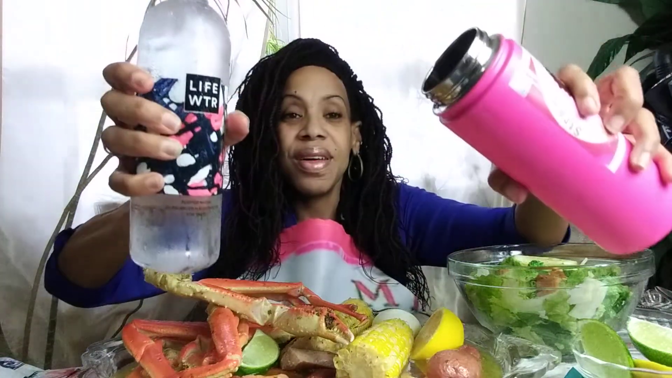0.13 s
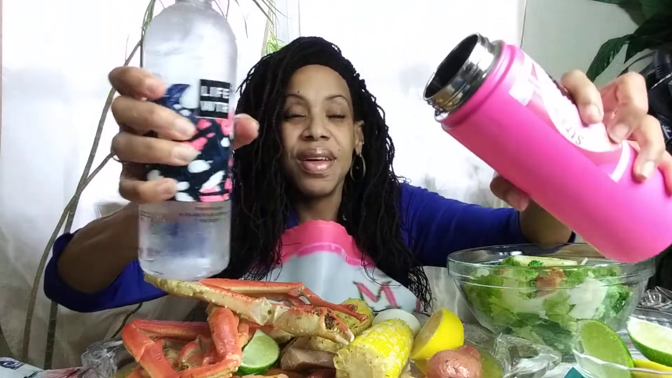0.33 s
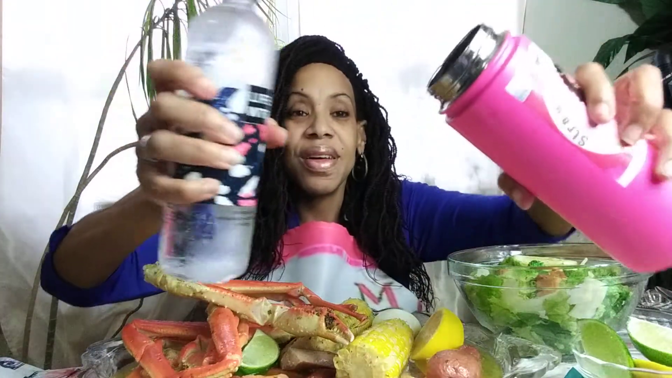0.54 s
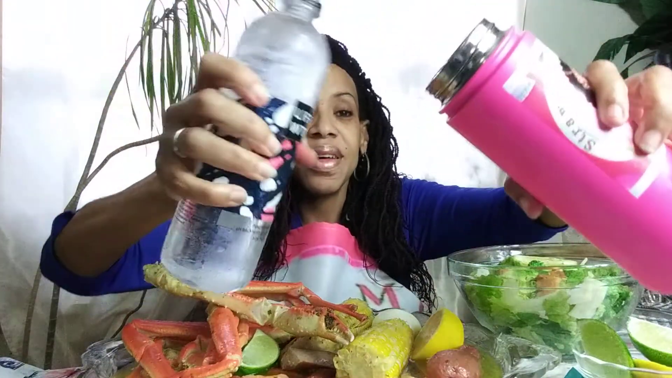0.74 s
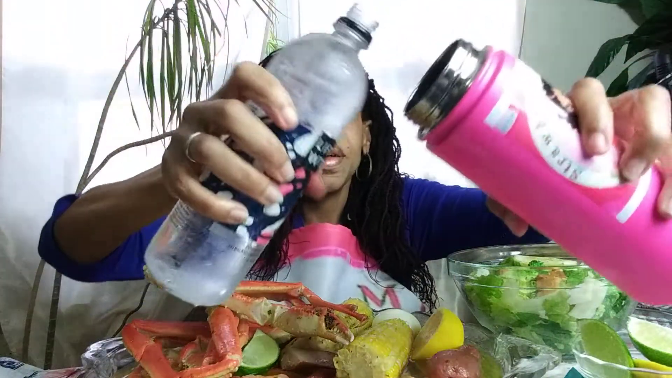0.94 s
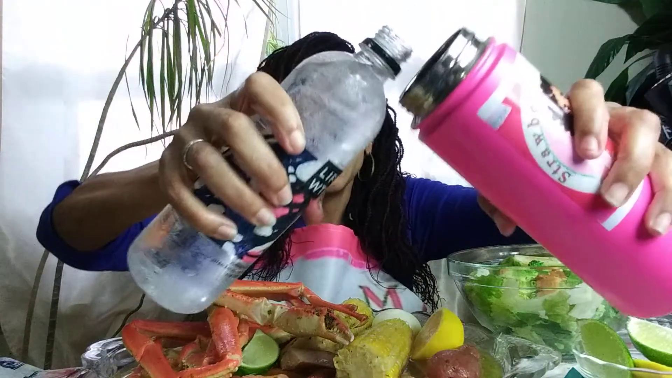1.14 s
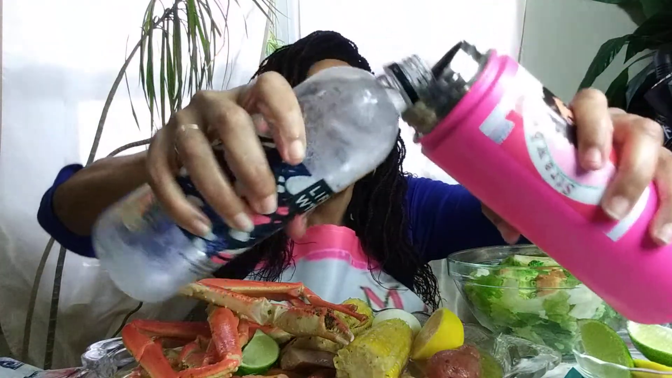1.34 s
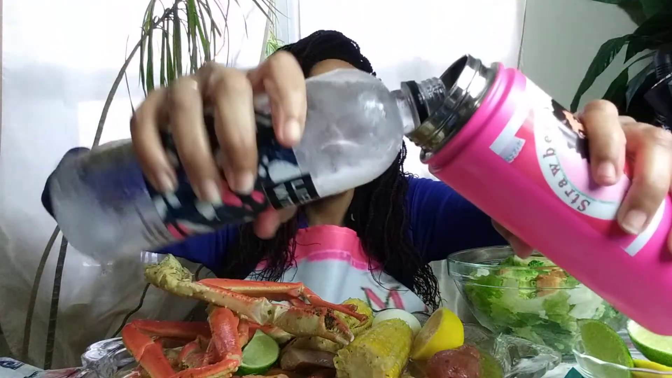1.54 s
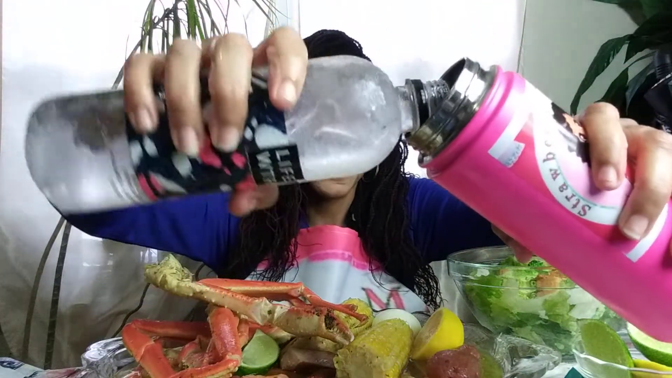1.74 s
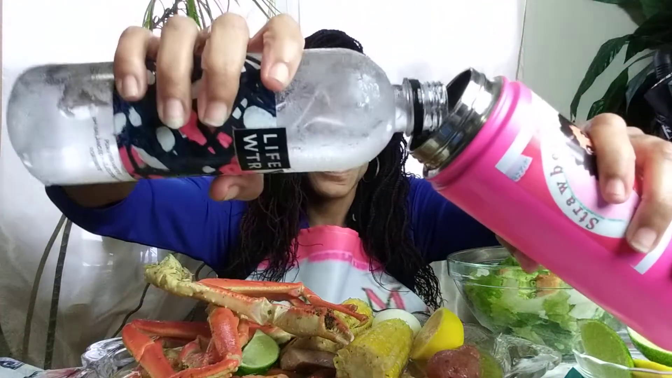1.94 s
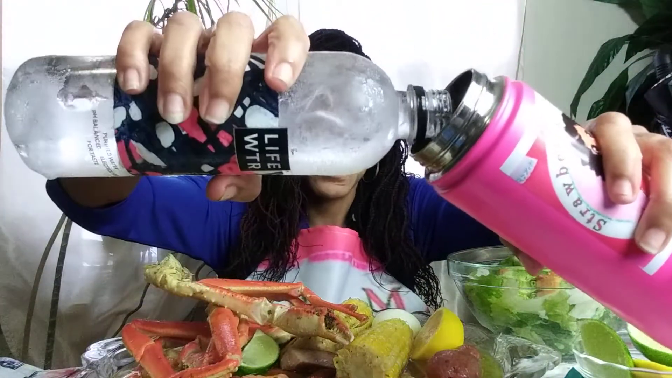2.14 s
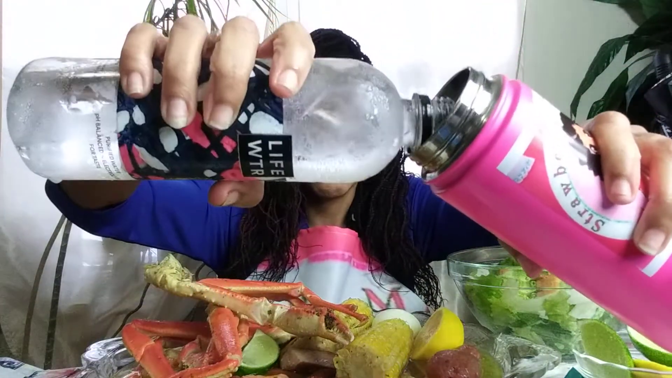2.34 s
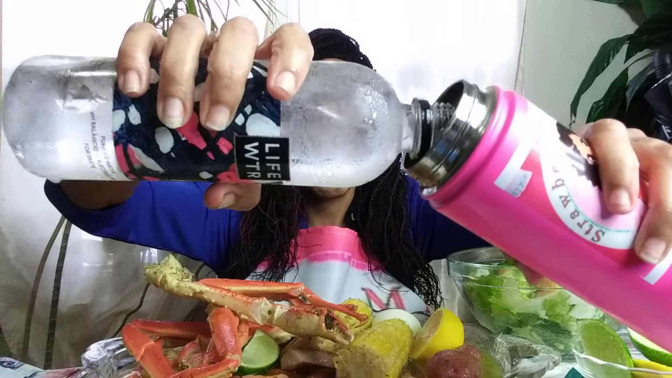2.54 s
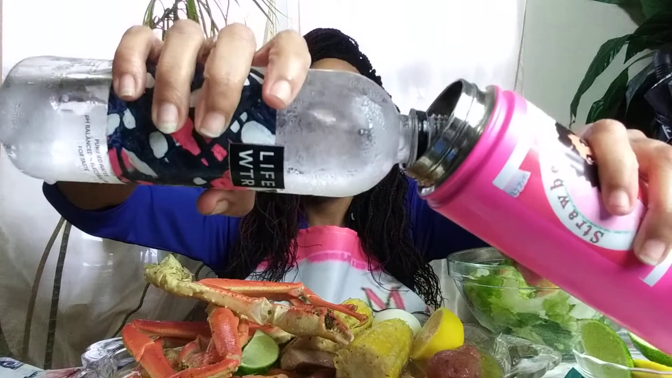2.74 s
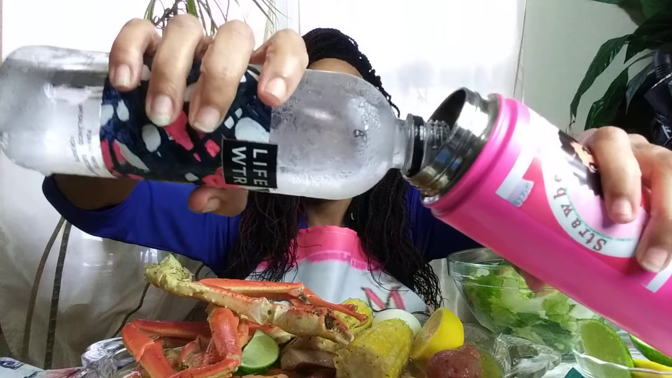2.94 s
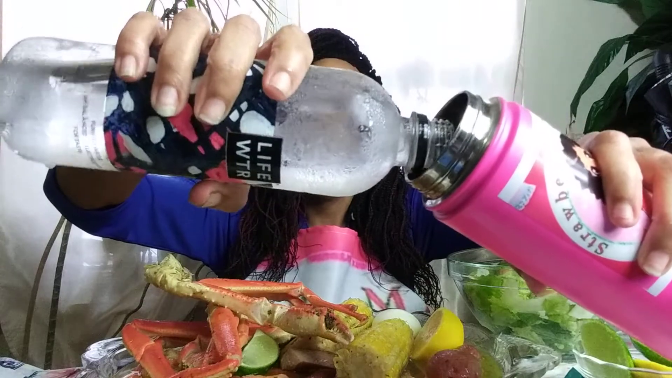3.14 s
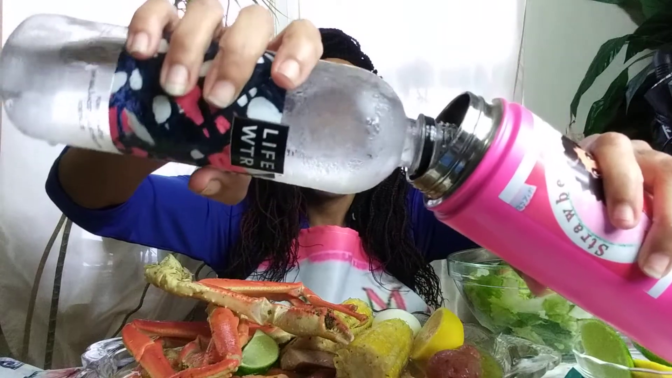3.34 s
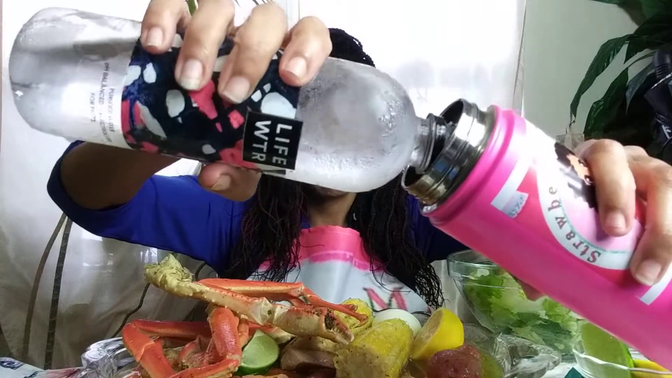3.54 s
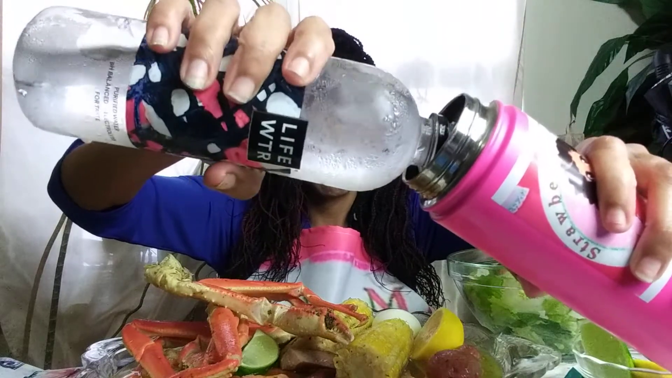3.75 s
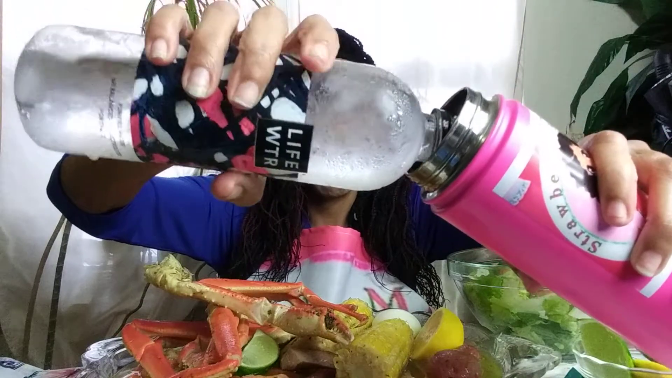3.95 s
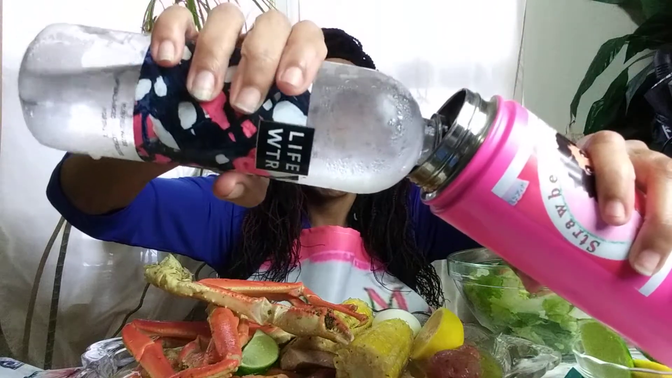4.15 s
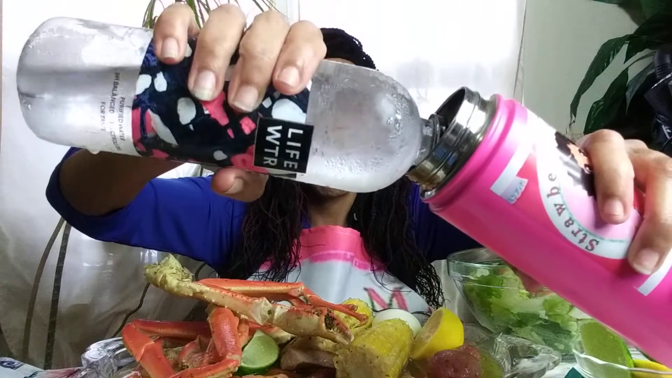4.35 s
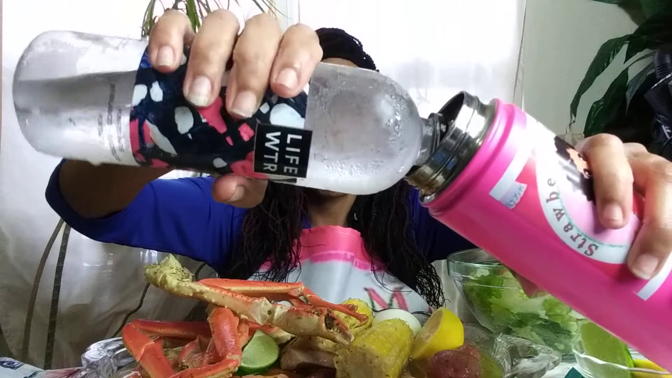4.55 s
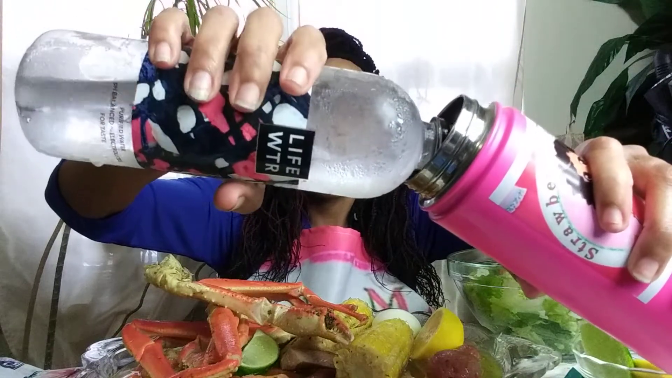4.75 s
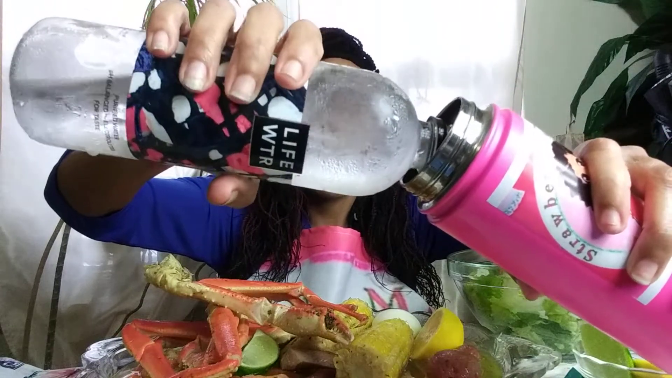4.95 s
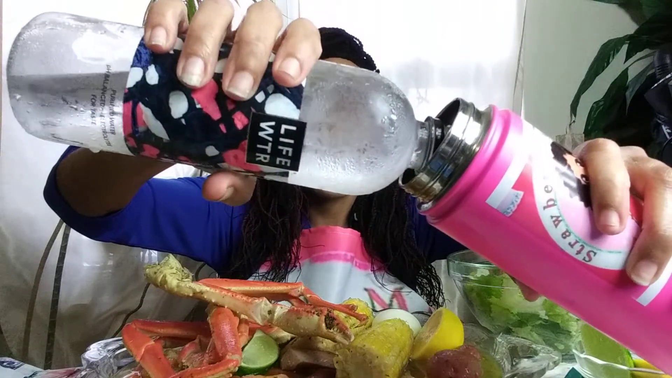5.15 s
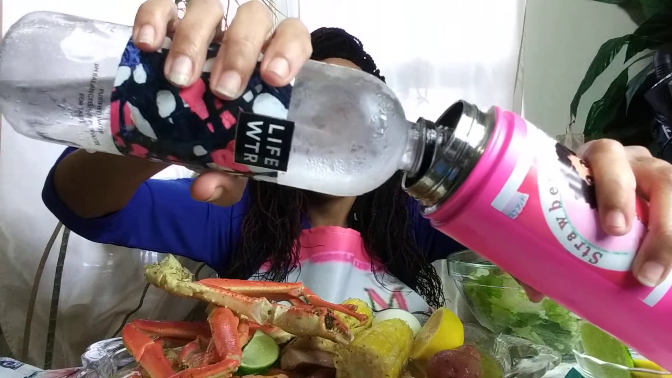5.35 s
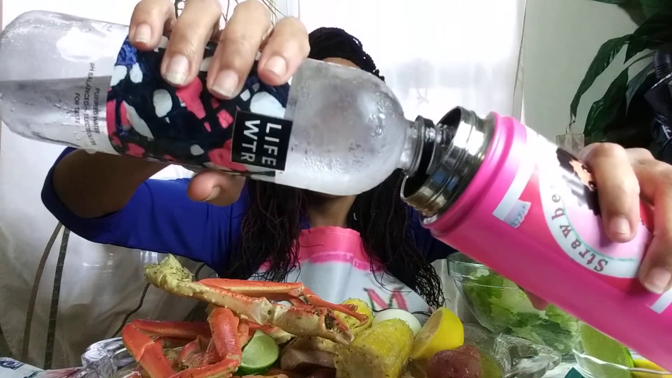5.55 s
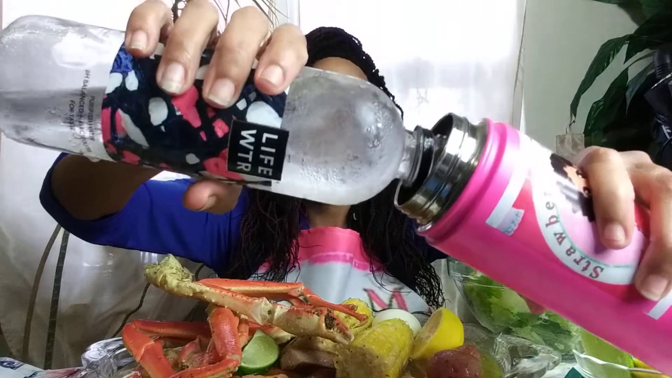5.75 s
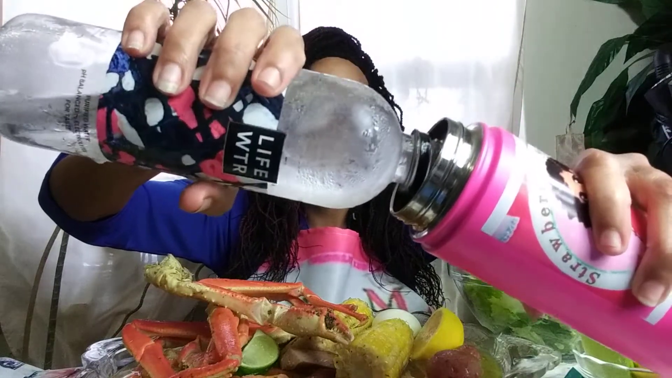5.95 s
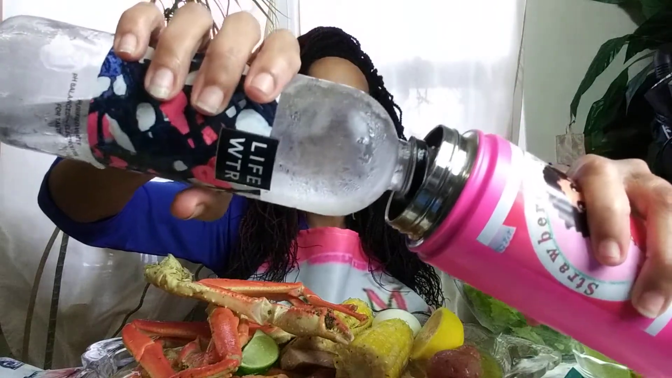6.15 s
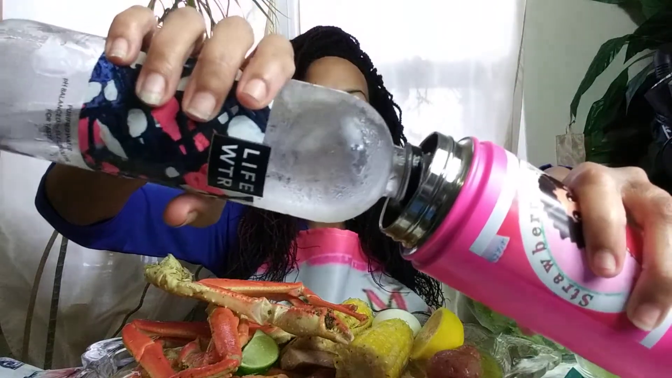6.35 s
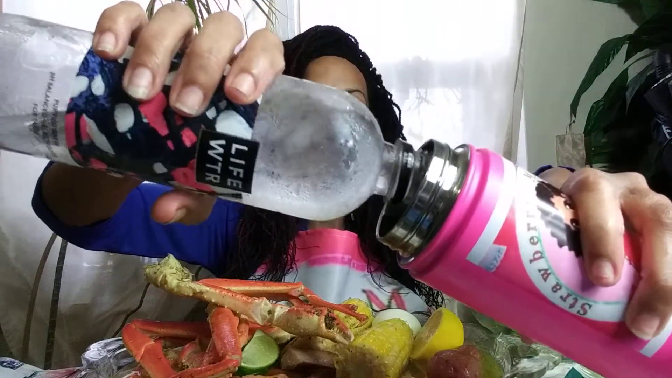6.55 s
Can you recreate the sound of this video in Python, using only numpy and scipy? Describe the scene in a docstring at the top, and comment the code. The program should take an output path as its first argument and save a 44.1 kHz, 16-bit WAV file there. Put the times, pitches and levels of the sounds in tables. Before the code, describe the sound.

Water glugs and trickles from a plastic bottle into a steel tumbler while ice cracks and clinks against the metal.

```python
"""Water glugs from a plastic bottle into a steel tumbler that holds ice, in a small live room.
Room tone is heard alone until, near 1.4 s, the first water plops, ice cracks against the steel
and rings its wall modes, and the bottle gulps air. Dry ticks follow; after 2.1 s a trickle sets in.
Each glug excites the tumbler's air column, whose resonance climbs as the water shortens it,
while the rising water damps the wall."""
import sys
import numpy as np
from scipy import signal
from scipy.fft import rfft, irfft
from scipy.io import wavfile
from scipy.ndimage import uniform_filter1d

SR = 44100
rng = np.random.default_rng(int(sys.argv[2]) if len(sys.argv) > 2 else 0)


def digitize_waveform(pressure):
    """Quantize a signal to 16-bit integers and store it at the path in sys.argv[1].

    Rows of a 2-D input are taken as channels; values are limited to [-1, 1].
    """
    field = np.atleast_2d(pressure).T
    bounded = np.clip(field, -1, 1)
    quanta = np.round(bounded * 32767).astype(np.int16)
    wavfile.write(sys.argv[1], SR, quanta)


N = 291501


def amp(db):
    return 10 ** (np.asarray(db) / 20)


def unit_rms(x):
    return x / np.sqrt(np.mean(x ** 2) + 1e-20)


def at_hz(points, hz):
    f, value = np.transpose(points)
    return np.interp(np.log(hz + 1), np.log(f + 1), value)


def at_time(points, s):
    return np.interp(s, *np.transpose(points))


def curve(points):
    return at_time(points, np.arange(N) / SR)


def add(mix, s, sound):
    part = mix[round(s * SR):][:len(sound)]
    part += sound[:len(part)]


def coloured(noise, spectrum):
    """Spectral shaping: noise of rms 1, weighted by (Hz, dB) points."""
    gain = amp(at_hz(spectrum, np.fft.rfftfreq(len(noise), 1 / SR)))
    return unit_rms(irfft(rfft(noise) * gain, len(noise)))


def resonate(x, hz, width_hz):
    """Forced resonance: x drives one mode whose natural frequency follows hz."""
    turn = np.exp(2j * np.pi * np.cumsum(hz) / SR)
    return (turn * signal.lfilter([1], [1, -np.exp(-np.pi * width_hz / SR)], x / turn)).real


def damped_tone(t, hz, t60, rise_s, glide):
    """Damped oscillation with a soft onset; pitch moves by glide times hz each second."""
    envelope = (1 - np.exp(-t / rise_s)) * amp(-60 * t / t60)
    return envelope * np.sin(2 * np.pi * hz * t * (1 + glide * t / 2))


# Background spectrum. Each row: frequency in Hz, relative density in dB.
ROOM_TONE_SPECTRUM = [(18, -92), (30, -67), (103, -16.5), (145, -13.5), (174, -5.5), (259, -3.5),
                      (415, -11.5), (499, -8), (569, -14.5), (702, -15), (1390, -19.5), (2610, -16.5),
                      (3220, -25.5), (7470, -27), (16000, -51.5)]
def room_tone(level_db=-61.5):
    """Stationary noise: a faint hush, strongest in the low hundreds of hertz."""
    return amp(level_db) * coloured(rng.standard_normal(N), ROOM_TONE_SPECTRUM)


# Underwater knocks and plops. Each row: start in seconds, note level in dB, pitch in Hz, splash in dB.
PLOPS = [(1.371, -33.5, 1157, -43.5), (1.386, -31, 1170, -43.5), (1.388, -38, 1056, -49),
         (1.517, -51, 1006, -47.5), (1.786, -52, 1460, -49), (1.786, -48, 880, -64),
         (2.065, -35, 1466, -39), (2.068, -41, 872, -43), (2.205, -19.5, 2129, -36),
         (2.207, -36, 1737, -44), (2.224, -21, 1311, -39), (2.342, -33.5, 2218, -43),
         (2.382, -43, 812, -37), (2.419, -36, 1200, -60), (2.5, -40.5, 2080, -55), (2.503, -36, 1197, -47),
         (2.532, -33, 1191, -42), (2.575, -38.5, 2067, -55), (2.61, -32.5, 1269, -40),
         (2.776, -42.5, 1295, -42), (2.802, -41, 968, -42), (3.043, -36, 1216, -38.5),
         (3.23, -45, 1880, -45), (3.454, -44, 980, -38.5), (3.474, -46, 1116, -37.5),
         (3.494, -39, 1860, -62), (3.575, -27, 1172, -31.5), (3.585, -42, 2320, -46),
         (3.7, -49, 1140, -40.5), (3.777, -44, 1350, -53), (3.818, -34, 1136, -40), (3.83, -32, 1132, -55),
         (3.856, -40, 1140, -53), (3.873, -42.5, 1893, -42.5), (4.104, -47, 2330, -36),
         (4.108, -28, 2965, -39), (4.176, -44, 1394, -40), (4.455, -47, 750, -52), (4.57, -38.5, 2970, -60),
         (4.937, -42, 2370, -41), (4.94, -44, 1150, -55), (5.346, -45.5, 1127, -60),
         (5.415, -46, 1850, -58), (5.42, -48, 1470, -59), (5.579, -39, 1437, -53),
         (5.689, -42.5, 1446, -48), (5.747, -41.5, 1433, -48), (5.778, -44, 1433, -55),
         (5.838, -40.5, 643, -51), (5.785, -39, 2404, -54), (5.906, -48, 2460, -44.5),
         (6.038, -34.5, 1760, -39.5), (6.113, -26, 3780, -53), (6.117, -45, 1410, -55),
         (6.15, -47, 1200, -62), (6.198, -37, 1560, -39), (6.203, -40, 1000, -38),
         (6.272, -35.5, 1712, -36), (6.273, -35.5, 1455, -42), (6.403, -41, 1640, -56),
         (6.457, -38.5, 1724, -41.5), (6.47, -43, 850, -55), (6.5, -43, 1640, -60),
         (6.552, -32, 910, -40.5)]
# Their decay, longest in the near-empty tumbler. Each row: time in seconds, t60 in seconds.
PLOP_DECAY = [(1.3, 0.077), (2.1, 0.16), (2.6, 0.097), (3, .05), (3.6, 0.072), (4.3, 0.12), (5.6, .08),
              (6.6, 0.068)]
def plops():
    """Beating: two close damped tones interfere, under a short splash of noise."""
    out, t = np.zeros(N), np.arange(16384) / SR
    sag = -0.172  # water climbing the wall pulls each note down
    for s, db, hz, splash_db in PLOPS:
        t60 = at_time(PLOP_DECAY, s)
        note = damped_tone(t, hz, t60, 0.0029, sag)
        note += amp(-8) * damped_tone(t, 1.028 * hz, t60, 0.003, sag)
        hump = [(300, -25), (hz * .78, -3), (hz, 0), (hz * 1.46, -6),
                (4000, -18), (6000, -28), (12000, -50)]
        splash = coloured(rng.standard_normal(len(t)), hump)
        splash *= np.exp(-t / 0.0069) * (1 - np.exp(-t / 0.00037))
        add(out, s - .002, amp(db) * note + amp(splash_db) * splash)
    return out


# Spectrum of cracking ice. Each row: frequency in Hz, relative density in dB.
CRACK_SPECTRUM = [(880, -43), (1500, 11.5), (1720, -35), (1900, -2.5), (2770, -14), (2970, -5), (6500, 2),
                  (7540, 4.5), (16000, -51.5)]
def ice_crack(t, colour, contact):
    """Brittle fracture: a burst of noise, then millisecond grains as the ice crumbles."""
    hz = np.linspace(800, 16000, 60)
    humps_db = 4 * rng.standard_normal(len(hz))  # every piece of ice has its own
    db = at_hz(CRACK_SPECTRUM, hz) + at_hz(colour, hz) + humps_db
    noise = coloured(rng.standard_normal(len(t)), list(zip(hz, db)))
    grains = amp(4 * np.minimum(np.repeat(rng.exponential(1, len(t) // 60), 60), 4) - 6)
    crumble = 0.07 * uniform_filter1d(grains ** 2, size=90) * np.exp(-t / 0.034)
    return noise * (1 - np.exp(-t / 0.0021)) * (contact + crumble)


# Clusters of wall modes. Each row: frequency in Hz, relative frequency spread, relative level in dB.
WALL_MODES = [(2447, 8.7, -20), (2960, 12, -21), (3347, 34.7, -14), (3520, 28, -15.5), (3767, 28.3, -8),
              (4470, 43, -23), (4746, 70, -9), (5080, 75.6, -5.5), (5960, 50, -5.5), (6320, 100, -9.5),
              (6950, 68, -4), (7140, 60, -3), (7550, 130, -18), (7560, 78, -7.5), (7700, 22, -7.5),
              (8060, 290, -6.5), (8140, 41, -5), (9250, 149, -8.5), (9850, 25, -19.5), (10200, 52, -32),
              (10440, 94, -24), (11300, 97, -43), (11500, 20, -22), (12600, 200, -28.5),
              (13900, 220, -25.5), (15200, 250, -33)]
# Damping by the rising water. Each row: time in seconds, typical t60 at 5 kHz in seconds.
WALL_DECAY = [(1.3, 0.24), (2.4, 0.2), (3.5, 0.088), (6.6, 0.1)]
def steel_ring(t, s, colour):
    """Modal superposition: nine partials a cluster, weighted by where the blow at time s lands."""
    hz, spread, db = np.repeat(np.transpose(WALL_MODES), 9, axis=1)
    strength, shift, life, phase = rng.standard_normal((len(hz), 4)).T
    spot_db = np.repeat(rng.standard_normal(len(WALL_MODES)), 9) * np.clip(s - 2.3, 0, 2.5)
    weights = amp(db + at_hz(colour, hz) + 3.5 * strength + spot_db)
    t60 = at_time(WALL_DECAY, s) * amp(2.14 * life) * (hz / 5000) ** -.55
    # partials scatter more as the water rises, and in the treble
    scatter = .002 + .011 * (s - 1.3) + .03 * np.minimum(hz / 12000, 1) ** 4
    partial_hz = hz + (0.601 * spread + scatter * hz) * shift
    partials = np.sin(2 * np.pi * (partial_hz[:, None] * t + phase[:, None]))
    return weights @ (amp(-60 * t / t60[:, None]) * partials) / np.linalg.norm(weights)


# Ice striking steel. Each row: start in seconds, blow level in dB, leading partial in Hz,
# its level relative to the blow in dB, boost near 4 kHz in dB, boost near 11 kHz in dB.
ICE_BLOWS = [(1.383, -27.5, 3810, -13, 17.5, 3), (1.6904, -34, 8430, -20, -14, 9),
             (1.7866, -17, 7020, -20, 1, 0), (1.8114, -21.5, 6320, -4.5, 7, 18),
             (1.917, -25, 7210, -4.5, -1.5, 13), (1.9707, -14.5, 7600, -9, -23, -1.5),
             (2.07, -6.5, 5877, -4.5, 2, -9), (2.0829, -5.5, 7100, -5, -7, 6),
             (2.206, -10.5, 5150, -3.5, -12.5, -5), (2.2246, -8.5, 6550, -25, -8, 5.5),
             (2.2572, -14, 7120, 1.5, -15, -13), (2.4375, -28.5, 4864, -9, -5, 3),
             (2.5, -26.5, 7640, -14, -6, 3), (2.5648, -29.5, 6980, -25, -2, 7),
             (2.6624, -21, 4590, -9, 8.5, 4), (2.815, -25, 7630, -16, 0, 10),
             (2.859, -27, 6750, -15, -1, -3), (3.1, -45, 4950, -20, 14, 2), (3.18, -49, 7850, -4, -5, -3),
             (3.25, -43, 2850, -6, 6, -2), (3.278, -43, 7000, -15, 7, -2),
             (3.3284, -18, 7670, -6.5, -3, 12), (3.494, -32.5, 4570, -3.5, -2, -7),
             (3.6145, -35, 6000, -9, 1, -6), (3.685, -31, 3830, -9, 21, 4), (3.765, -37, 2890, -12, 3, -2),
             (3.8116, -34, 6230, -13, 4, 9), (3.8711, -33, 7130, -8, 4, -2), (4.0033, -38, 8120, -8, 7, -2),
             (4.0623, -21, 4200, -17, 9.5, 0), (4.1076, -14.5, 7580, -11, 3.5, 3),
             (4.1562, -15, 8110, -8.5, -0.5, 1), (4.2997, -28, 6710, -11, 1.5, 10),
             (4.329, -24.5, 7540, -7, 3.5, 12), (4.4307, -27, 4064, -11, 3, -1),
             (4.571, -19, 7600, -14, 3, 5), (4.8463, -32.5, 7600, -9, 0.5, 6),
             (4.936, -20.5, 3010, -14, 9, -1), (4.9777, -21.5, 4170, -14, 6, -5),
             (5.008, -31.5, 7000, -15, 3, 0), (5.1274, -15, 7660, -10.5, 3.5, 0),
             (5.258, -38.5, 4370, -10, 16, 6), (5.4094, -19, 7600, -12.5, 1, -4),
             (5.5188, -26.5, 7460, -16, 0, -4), (5.5301, -20, 7560, -11, 0, -6),
             (5.656, -22.5, 7400, -10.5, 1.5, 1), (5.7654, -19.5, 3780, -19, 2.5, -8),
             (5.8694, -35.5, 7300, -9, 8, 3), (6.0395, -14.5, 4620, -13.5, 3, -1),
             (6.057, -20.5, 4580, -11, 4, 0), (6.1145, -13, 7540, -22, -2, 0),
             (6.32, -32.5, 3574, -7, 7.5, 0), (6.4033, -21, 7250, -15.5, 0.5, -1.5),
             (6.466, -34, 5000, -20, 6, -10), (6.4826, -27, 5140, -8, 5, -20),
             (6.551, -31.5, 6340, -18, 5, 10)]
def clinks():
    """Impact excitation: every blow cracks the ice and sets the steel in free vibration."""
    out, t = np.zeros(N), np.arange(9000) / SR
    contact = np.exp(-t / 0.0065)
    for s, blow_db, lead_hz, lead_db, low, high in ICE_BLOWS:
        colour = [(1500, low - 6), (4000, low), (7000, 0.011), (11000, high), (15000, high - 1.5)]
        crack = ice_crack(t, colour, contact)
        ring = steel_ring(t, s, colour) * (1 - 0.58 * contact ** 3)
        lead = damped_tone(t, lead_hz, t60=0.069 * (s / 2) ** -.3, rise_s=0.00072, glide=0)
        # harder blows ring more, a wetter wall less
        ring_share = np.clip(.7 + 0.09 * (blow_db + 24.5) - 0.051 * s, 0, 1)
        sound = 0.8 * (1 - ring_share) * crack + .5 * ring_share * ring + amp(lead_db) * lead
        add(out, s - .002, amp(blow_db) * sound)
    return out


# Air gulped at the bottle neck. Each row: start in seconds, relative level in dB.
GLUGS = [(1.385, -43), (2.223, -53), (2.274, -55), (2.38, -46.5), (2.455, -49.5), (2.538, -45.5),
         (2.606, -46.5), (2.68, -51), (2.72, -49.5), (2.773, -47.5), (2.8, -47.5), (2.823, -50),
         (2.926, -52), (3.041, -48.5), (3.184, -47), (3.248, -45), (3.28, -46), (3.454, -47),
         (3.573, -45.5), (3.635, -45.5), (3.692, -43), (3.815, -43), (3.855, -43), (3.97, -45),
         (4.066, -40.5), (4.152, -46.5), (4.26, -44.5), (4.332, -46.5), (4.453, -41), (4.567, -45),
         (4.674, -42.5), (4.776, -44.5), (4.881, -42.5), (4.967, -46), (5.07, -44), (5.173, -48.5),
         (5.26, -44), (5.348, -23), (5.469, -50), (5.579, -49.5), (5.676, -46.5), (5.695, -44),
         (5.72, -46.5), (5.793, -44.5), (5.838, -37.5), (5.906, -42.5), (6.02, -49), (6.034, -36),
         (6.059, -36.5), (6.085, -43.5), (6.202, -45.5), (6.277, -48), (6.386, -42.5), (6.46, -43.5),
         (6.483, -45), (6.552, -40), (6.578, -44)]
# Lowest resonance of the tumbler's air column. Each row: time in seconds, frequency in Hz.
AIR_COLUMN = [(1.3, 375), (2.4, 378.4), (3.2, 395), (4.1, 404.5), (4.7, 429), (5.3, 470), (5.9, 499),
              (6.1, 499), (6.3, 537.6), (6.6, 592)]
def glugs():
    """Air-column resonance: a bubble thumps low, sweeps upward and drives two modes that ring on."""
    gulp, thump, t = np.zeros(N), np.zeros(N), np.arange(4096) / SR
    for s, db in GLUGS:
        hz = at_time(AIR_COLUMN, s) * rng.normal(1.0045, 0.011)
        add(gulp, s - .004, amp(db) * damped_tone(t, hz, 0.057, 0.0028, glide=4.3))
        add(thump, s - .006, amp(min(db, -41) - 2) * damped_tone(t, 0.63 * hz, 0.037, 0.0012, glide=13))
    air_hz = curve(AIR_COLUMN)
    column = amp(-41.5) * resonate(gulp, air_hz, 11.6) + amp(-15.5) * resonate(gulp, 2.5 * air_hz, 32)
    return amp(4) * gulp + thump + column


# Dry clicks. Each row: start in seconds, level in dB, centre frequency in Hz.
TICKS = [(1.672, -46.5, 2300), (1.692, -39, 5200), (1.729, -49, 2500), (3.455, -40, 2800),
         (3.475, -37.5, 2750), (4.499, -46, 7200), (4.691, -47, 9500)]
def ticks():
    """Transients: bands of noise that decay in milliseconds and leave the steel silent."""
    out, t = np.zeros(N), np.arange(2048) / SR
    for s, db, hz in TICKS:
        band = [(300, -30), (.6 * hz, -12), (hz, 0), (1.3 * hz, -10), (2 * hz, -36)]
        click = coloured(rng.standard_normal(len(t)), band)
        add(out, s - .001, amp(db) * click * np.exp(-t / 0.0026))
    return out


# Strength of the trickle. Each row: time in seconds, bubble level in dB.
TRICKLE_LEVEL = [(2.1, -100), (2.4, -51), (3, -58), (3.6, -57.5), (4.2, -60), (4.8, -57.5), (5.4, -64.5),
                 (6, -62), (6.2, -49), (6.6, -77)]
# The finest bubbles bursting. Each row: frequency in Hz, relative density in dB.
FIZZ_SPECTRUM = [(2000, -30), (4000, -23), (7500, 11.5), (9500, -1), (14000, -27)]
def trickle():
    """Bubble resonance: the stream traps clumps of bubbles, each ringing at the pitch of its size."""
    bubbles, t = np.zeros(N), np.arange(1024) / SR
    clumps = np.repeat(rng.exponential(1, N // 400 + 1), 400)[:N]
    for hz in np.geomspace(600, 6000, 30):
        strength = amp(3 * np.minimum(rng.exponential(1, N), 3))
        births = rng.random(N) < 30 * clumps / SR
        bubble = damped_tone(t, hz, 50 / hz, 0.95 / hz, glide=7.8) * (hz / 1000) ** 0.56
        bubbles += signal.oaconvolve(strength * births, bubble)[:N]
    bursts = rng.standard_normal(N) * amp(4.7 * np.minimum(rng.exponential(1, N), 5))
    spurts = np.repeat(rng.exponential(1, N // 1500 + 1), 1500)[:N]
    fizz = coloured(bursts, FIZZ_SPECTRUM) * uniform_filter1d(spurts, size=600) ** .7
    water = (unit_rms(bubbles) + amp(-9) * fizz) * amp(curve(TRICKLE_LEVEL))
    return water + amp(-64) * resonate(water, curve(AIR_COLUMN), 6.7)


# Reverberation time of the room. Each row: frequency in Hz, t60 in seconds.
ROOM_DECAY = [(200, 0.29), (1000, 0.46), (4000, 0.38), (8000, 0.32), (14000, 0.2)]
def reverberation(x):
    """Reverberant decay: three tails of sparse reflections, fed in turn, each band at its own rate."""
    out, turn = np.zeros(N), 2 * np.pi * 2.3 * np.arange(N) / SR
    slots = np.arange(200, SR - 20, 20)
    for k in range(3):
        taps = np.zeros(SR)
        taps[slots + rng.integers(0, 20, len(slots))] = rng.choice([-1., 1.], len(slots))
        hz, t, bands = signal.stft(taps, SR, nperseg=256)
        decay = amp(-60 * t / at_hz(ROOM_DECAY, hz)[:, None])
        tail = signal.istft(bands * decay, SR, nperseg=256)[1]
        feed = np.sqrt(2 / 3) * np.cos(turn + k * np.pi / 3)
        out += signal.fftconvolve(x * feed, tail / np.linalg.norm(tail))[:N]
    return out


def scene():
    """Superposition: direct sound, reverberation and room tone add in one channel."""
    ice, air, water = clinks() + ticks(), glugs(), plops() + trickle()
    pour = ice + air + water + reverberation(amp(-4) * ice + amp(-7.5) * air + amp(-7) * water)
    low_cut = signal.butter(4, 140, "high", fs=SR, output="sos")  # small objects radiate no bass
    return (signal.sosfilt(low_cut, pour) + room_tone())[None]


def record(dry):
    """Band limiting: a steep low-pass removes the highest treble."""
    low_pass = signal.firwin(511, 16250, window=("kaiser", 9), fs=SR)
    return signal.oaconvolve(dry, low_pass[None], "same")


dry = scene()
out = record(dry)
digitize_waveform(out)
```